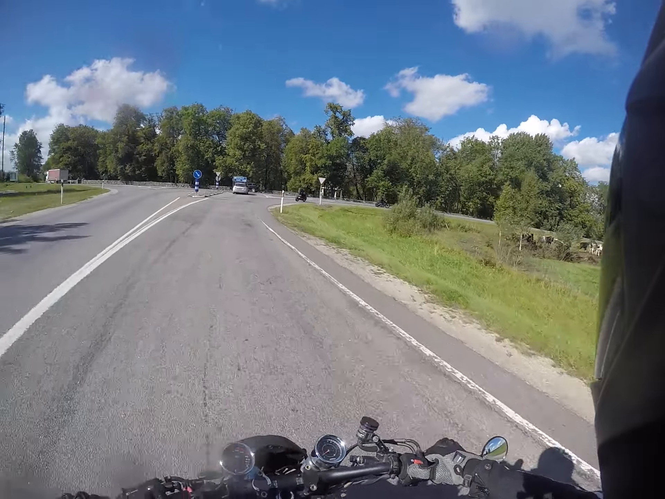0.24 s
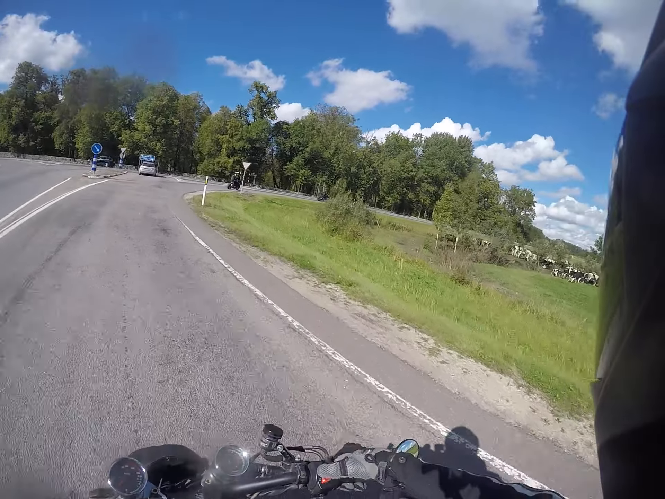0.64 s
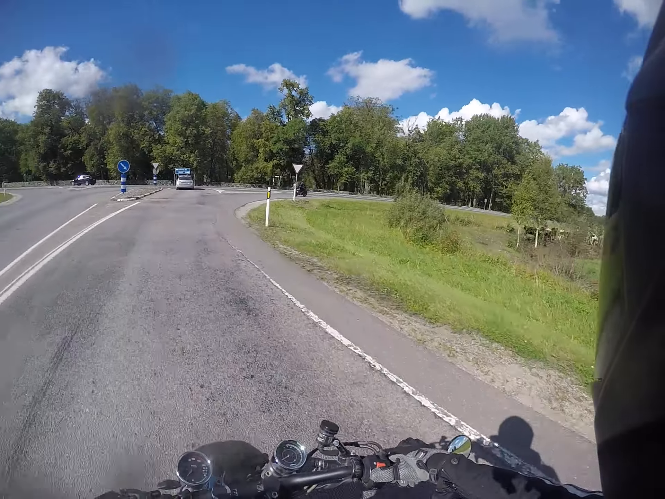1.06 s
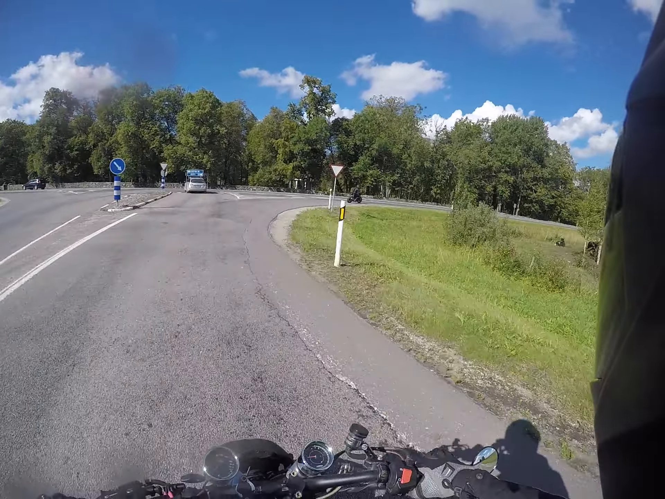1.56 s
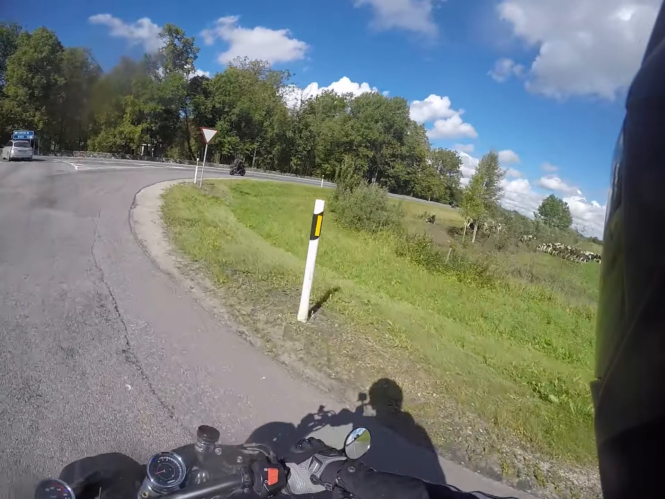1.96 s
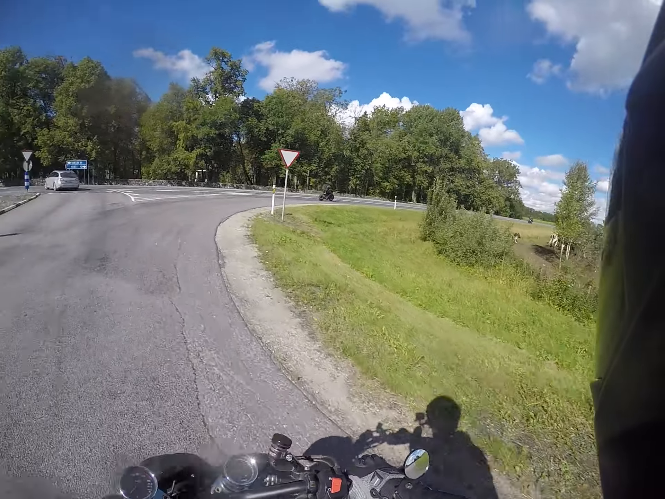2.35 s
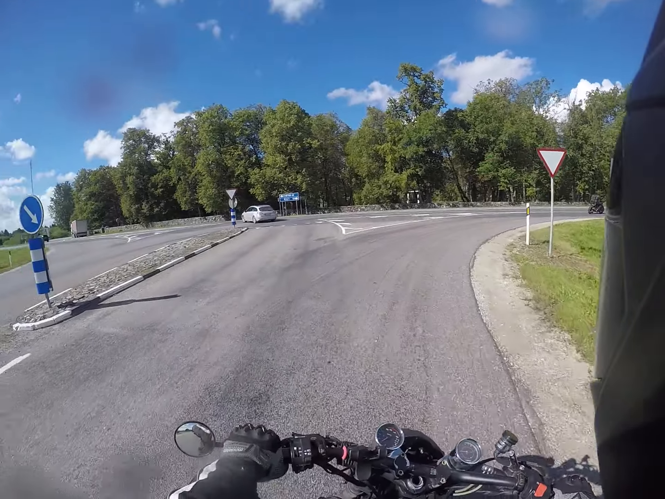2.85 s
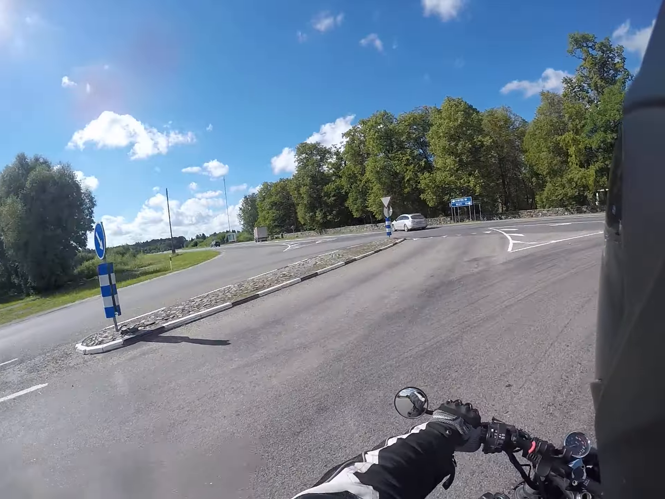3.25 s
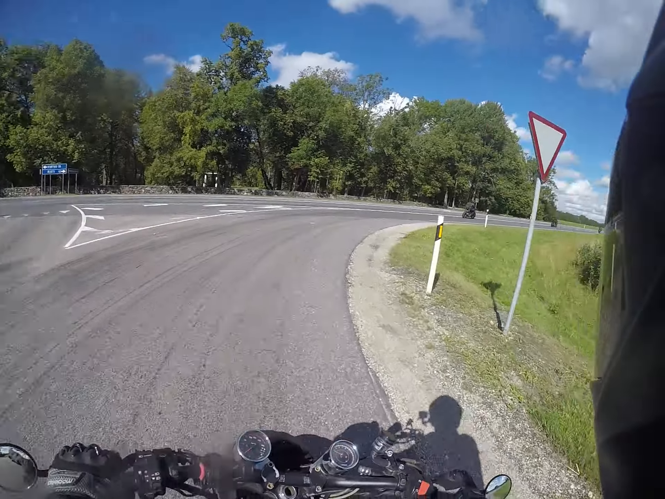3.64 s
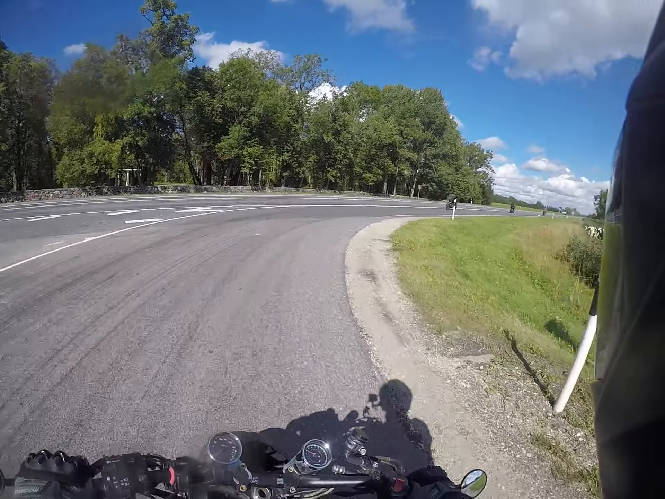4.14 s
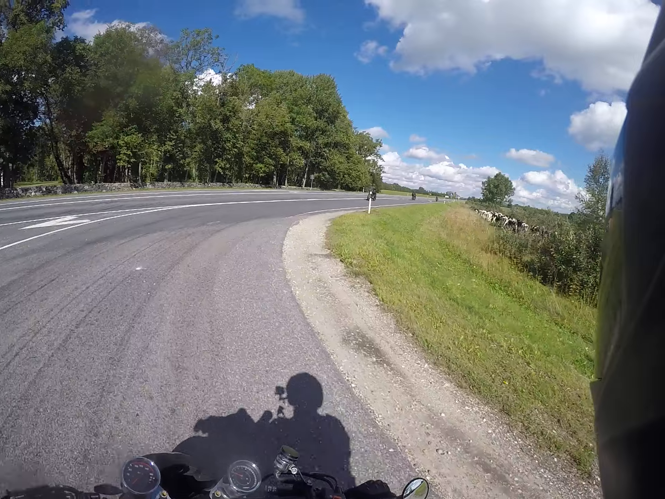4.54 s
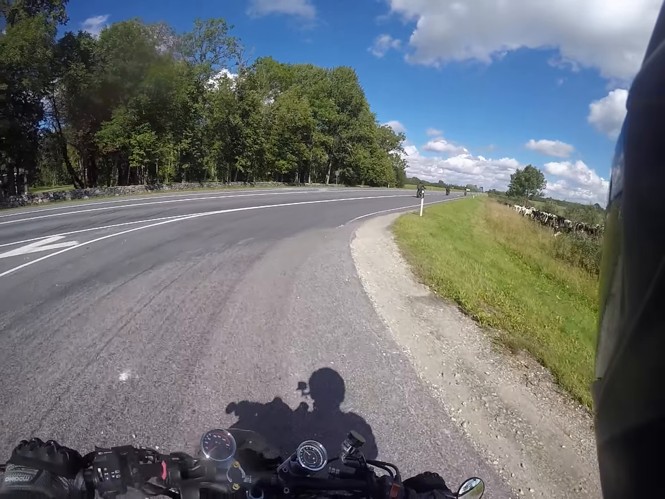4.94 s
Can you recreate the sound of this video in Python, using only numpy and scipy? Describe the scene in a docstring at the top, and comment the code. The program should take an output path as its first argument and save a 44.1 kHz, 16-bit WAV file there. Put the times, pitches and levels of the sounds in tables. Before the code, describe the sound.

A four-cylinder motorcycle slows, blips its throttle between two loud backfire bangs, sinks to a puttering idle, then pulls away through wind.

```python
"""At a road junction, from the rider's helmet: a four-cylinder motorcycle slows, idles and pulls away.
Summed overtones make the exhaust; pulses rung by the airbox make the bark. The revs sink, flare in one blip
between two loud bangs of burning fuel, settle to idle, where a weak bang sounds, then climb in three rises.
Shaped noise makes clatter, dull idle knocks, and the wind that buffets the microphone and whistles at the helmet,
over a rumble of tyres and frame. Farther off a second engine blips; a few brief swells of narrow noise pass."""
import sys
import numpy as np
from scipy import signal
from scipy.fft import rfft, irfft
from scipy.io import wavfile
from scipy.ndimage import uniform_filter1d

SR = 44100
rng = np.random.default_rng(int(sys.argv[2]) if len(sys.argv) > 2 else 0)


def to_wav(sig):
    """Store sig (one row per channel, or 1-D mono) as 16-bit WAV at the path in sys.argv[1].

    Samples outside -1..1 are clipped; the rate is SR.
    """
    pcm = np.clip(np.atleast_2d(sig), -1, 1) * 32767
    pcm = np.round(pcm).astype(np.int16)
    wavfile.write(sys.argv[1], SR, pcm.T)  # frames by channels


N = 229187
T = np.arange(N) / SR  # time [s]
HZ = np.fft.rfftfreq(N, 1 / SR)  # spectrum bins [Hz]

# Twists of the throttle: (opens [s], shuts [s], firing rate reached [1/s], bend of the climb [exponent],
# lift of the firing tone [dB], overtones under load [dB], bark under load [dB])
THROTTLE = [(.395, .636, 348.5, 1.24, 4, -24, -20.5), (3.391, 3.985, 102, .72, 2.5, -39.5, -59),
            (4.185, 4.447, 77, 1.04, 3.5, -40, -60), (4.447, 4.719, 171.4, 2.58, 0, -38.5, -59),
            (4.985, 5.183, 163.5, .8, -5.5, -38, -48)]
# Exhaust with the throttle shut: (firing rate [1/s], firing tone [dB], overtones [dB])
COASTING = [(40.97, -34, -38), (53, -31.5, -40), (79.12, -26, -42.5), (104, -28, -47.5),
            (129.5, -22.5, -44.5), (200, -22.5, -52), (273, -19, -30.5), (340, -20, -52)]
# Exhaust overtones, half orders from unequal cylinders: (multiple of the firing rate [ratio], level [dB])
ORDERS = [(.5,-8),(1.5,-3.5),(2,6),(2.5,-15),(3,-2),(4,-5.5),(5,-10.5),(6,-12)]
# What the pipe favours in the overtones: (frequency [Hz], width [Hz], level [dB])
PIPE = [(134,175,-1.5),(237.6,59,-1),(367,50,-1),(610,260,-14)]
# Airbox and pipe resonances behind the bark: (frequency [Hz], width [Hz], level [dB])
AIRBOX = [(356,88,1.5),(580,250,-4),(861,68,0.5),(995,81,-10),(1270,390,-35),(1710,210,-12),(3020,490,-19)]
# Spectrum of valves and chain, ahead of the housing: (frequency [Hz], density [dB per Hz, relative])
CLATTER = [(240, -14.5), (400, -7), (473, -34), (643, 0.5), (738, -17), (860, -25.5), (1360, -9.5),
           (1740, -4.5), (2060, -14), (3160, -12), (3460, -12.5), (4160, -17.5), (6380, -18), (7440, -28.5),
           (15500, -44.5)]
# What the idle knock rings: (frequency [Hz], width [Hz], level [dB])
CASING = [(602,23,9.5),(1020,73,-14),(2010,190,11.5),(3000,300,-30)]
# Exhaust bangs: (time [s], pressure wave scale [dB], ring peak [dB], spit scale [dB], length of the push [s])
BANGS = [(0.2935,-2.5,-3.5,-17.5,0.0035),(1.159,-1.5,-3.5,-11,0.0041),(3.247,-23,-29,-64,0.0031)]
# What the silencer rings with: (frequency [Hz], width [Hz], level [dB])
SILENCER = [(375,85,22),(448,110,-17),(694,32,17),(920,50,-24),(920,31,-11),(1440,60,-17),(1920,19,21),(2280,32,-19),(3000,38,-26),(2800,44,-7),(4040,83,-61),(4630,180,-9)]
# Spectrum of the gas spitting out: (frequency [Hz], density [dB per Hz, relative])
SPIT = [(300,-0.5),(1500,1),(4600,-8.5),(6000,-16),(15000,-35)]
# Hollow colour of the camera housing: (frequency [Hz], width [Hz], boost or cut [dB])
HOUSING = [(451,47,-3),(685,25,5),(744,93,10),(1025,130,13.5),(1350,260,-9),(2054,180,6.5),(2400,170,5),(2856,43,6.5),(3310,150,2.5),(3540,118,-10.5),(3796,140,6),(4034,160,4.5),(4810,98,10),(4960,230,-8),(5670,420,4),(6370,190,-30.5),(7710,210,12.5),(8070,360,-16),(8350,150,12.5),(10200,69,12)]
# Spells of wind round the helmet: (start [s], end [s], rush [dB], whistle [dB])
WIND = [(-.1, 0.663, -32.5, -31), (0.775, 1.37, -32.5, -35), (1.382, 1.553, -34, -31.5),
        (1.59, 1.83, -36.5, -32), (2.46, 2.697, -38.5, -36), (2.697, 3.06, -44, -36),
        (3.113, 3.81, -47.5, -39.5), (3.932, 4.155, -45.5, -38.5), (4.58, 4.933, -38.5, -42),
        (5.099, 5.304, -36, -41)]
# Spectrum of the rushing air, ahead of the housing: (frequency [Hz], density [dB per Hz, relative])
RUSH = [(200,-31),(500,-4),(1000,-12.5),(1350,5.5),(1900,-5.5),(2600,-0.5),(3600,-9),(4600,-14),(6500,-36),(15000,-51.5)]
# Strongest gusts on the microphone: (time [s], length [s], level [dB])
GUSTS = [(0.3, 0.054, -16), (.46, .04, -15), (1.5, .07, -25), (1.917, 0.068, -23), (2.074, 0.087, -16.5),
         (2.227, 0.063, -19.5), (2.438, 0.067, -21), (3.097, .09, -13.5), (3.312, 0.072, -18.5)]
# Spectrum of the gusts: (frequency [Hz], density [dB per Hz, relative])
GUST = [(5,-20),(16,-6.5),(26,22),(36,7.5),(50,-52),(100,-14),(200,-33),(400,-51),(2000,-84)]
# Rumble of tyres and frame: (time [s], level [dB])
ROAD_DB = [(0,-26),(.4,-30.5),(.6,-33.5),(.9,-30),(1.5,-32),(2.2,-38),(3.2,-38),(4,-34.5),(4.5,-33),(4.8,-26.5),(5,-28.5),(5.2,-37)]
# Spectrum of that rumble: (frequency [Hz], density [dB per Hz, relative])
ROAD = [(20,-20.5),(70,4.5),(130,-3.5),(240,-7),(400,-23),(650,-24.5),(800,-25),(1300,-27),(4000,-32.5),(15000,-56.5)]
# Second engine blipping farther off: (time [s], firing rate [1/s], level [dB])
FAR_BLIP = [(4.38,125,-65),(4.42,148,-41),(4.46,198,-31.5),(4.5,243,-38),(4.56,295,-45),(4.65,330,-44),(4.75,326,-45),(4.85,280,-70)]
# What carries of that engine: (frequency [Hz], width [Hz], level [dB])
FAR_BODY = [(377,140,-6.5),(696,70,-2),(1041.6,112.3,-2),(1570,110,6),(2040,92,7.5)]
# Brief swells of narrow noise, three near 800 Hz and two faint high hisses:
# (time [s], length [s], frequency [Hz], width of each filter pass [Hz], level [dB])
NOISE_SWELLS = [(3.325,0.022,820,350,-40),(3.644,0.011,780,350,-39),(3.693,0.013,800,350,-37),(4.573,0.07,11400,3000,-57),(4.955,0.15,10700,3500,-56.5)]

START_HZ, START_DRAG_PER_S = 212.7, 1.55  # first firing rate, and its exponential fall under the brakes
DRAG_PER_S, IDLE_HZ = 1.34, 42  # exponential fall with the throttle shut, down to the idle firing rate
OPEN_S, SHUT_S = 0.11, .03  # how fast the load builds and lets go
OVERRUN_DB, OVERRUN_S, OVERRUN_FADE_S = 2.5, 0.18, 0.063  # the pipe booms briefly after the throttle shuts
CANCEL_HZ, CANCEL_WIDTH_HZ, CANCEL_DB = 287, 20.2, -20  # the firing tone drops out as it passes this pitch
HIGH_HZ = 320  # firing rate at which the HIGH levels hold, apart from the floor
# With the throttle shut: level at HIGH_HZ, its slope with the revs, its floor
BARK_HIGH_DB, BARK_DB_PER_DECADE, BARK_IDLE_DB = -23, 70, -52.5
CLATTER_HIGH_DB, CLATTER_DB_PER_DECADE, CLATTER_IDLE_DB = -32, 54, -64
CLATTER_LOAD_DB, CLATTER_TOP_DB = 2.5, -34  # lift of the clatter under load, and its ceiling
WIND_RISE_S, WIND_FALL_S, CALM_RUSH_DB, CALM_WHISTLE_DB = 0.24, 0.19, -47.5, -47
BUFFET_DB, BUFFET_SWING_DB, BUFFET_HZ = -32.5, 2.5, 7.9  # the small gusts between the strong ones
EDGE_HZ = 15350  # top of the recorder's band


def speed():
    """Firings per second: an open throttle drives the revs to its mark, a shut one lets them sink to idle."""
    hz = START_HZ * np.exp(-START_DRAG_PER_S * T)
    for opens, shuts, top, bend, *_ in THROTTLE:
        low = np.interp(opens, T, hz)
        progress = np.clip((T - opens) / (shuts - opens), 0, 1)
        climb = low + (top - low) * progress ** bend
        coast = np.maximum(top * np.exp(-DRAG_PER_S * (T - shuts)), IDLE_HZ)
        hz = np.select([T < opens, T < shuts], [hz, climb], coast)
    return uniform_filter1d(hz, size=880, mode="nearest")  # smoothed over 20 ms


def with_revs(hz, high_db, db_per_decade, idle_db):
    """A level in dB that grows as a power of the revs, above a floor at idle."""
    growing = gain_of(high_db + db_per_decade * np.log10(hz / HIGH_HZ))
    return 20 * np.log10(np.hypot(growing, gain_of(idle_db)))


def engine_levels(hz):
    """Firing tone, overtones, bark and clatter in dB: set by the revs, changed by the load."""
    rate, tone, over = np.transpose(COASTING)
    cancelled = np.exp(-((hz - CANCEL_HZ) / CANCEL_WIDTH_HZ) ** 2)
    tone_db = np.interp(hz, rate, tone) + CANCEL_DB * cancelled
    over_db = np.interp(hz, rate, over)
    bark_db = with_revs(hz, BARK_HIGH_DB, BARK_DB_PER_DECADE, BARK_IDLE_DB)
    clatter_db = with_revs(hz, CLATTER_HIGH_DB, CLATTER_DB_PER_DECADE, CLATTER_IDLE_DB)
    for opens, shuts, _, _, lift_db, loaded_over_db, loaded_bark_db in THROTTLE:
        load = spell(opens, shuts, OPEN_S, SHUT_S)
        overrun = spell(shuts, shuts + OVERRUN_S, OVERRUN_FADE_S, OVERRUN_FADE_S)
        tone_db = tone_db + load * lift_db + OVERRUN_DB * overrun
        over_db = over_db + load * (loaded_over_db - over_db)
        bark_db = bark_db + load * (loaded_bark_db - bark_db)
        clatter_db = clatter_db + load * CLATTER_LOAD_DB
    return tone_db, over_db, bark_db, np.minimum(clatter_db, CLATTER_TOP_DB)


def exhaust(firings, hz, tone_db, over_db, waver=0.11, rough=0.22, throb=0.28, dull_db=1.0, smear=0.611):
    """A firing tone, and overtones through the pipe that dull and lope every four firings towards idle."""
    idle = np.clip(45 / hz, 0, 1) ** 3
    angle = 2 * np.pi * firings + .15 * idle * wander(20)
    tone = np.cos(angle) * (1 + waver * wander(69))
    overtones = np.zeros(N)
    for k, db in ORDERS:
        strength = gain_of(db - dull_db * idle * (k - 2)) * (1 + rough * wander(25))
        overtones += strength * np.cos(k * angle - smear * k ** 2)
    lope = 1 + throb * idle * np.cos(np.pi * firings / 2)
    piped = lope * housed(ring(overtones, PIPE))
    return np.sqrt(2) * (gain_of(tone_db) * tone + gain_of(over_db) * piped)


def bark(firings, hz, level_db, body, top_hz=2600):
    """One pulse a firing rings the body; the four cylinders differ more at high revs."""
    angle = 2 * np.pi * (firings + .012 * wander(150))
    pulses = np.zeros(N)
    for k in np.arange(2, 32):
        # the intake runners smear each pulse: higher harmonics arrive later
        pulses += np.cos(k * angle - .2 * k ** 2) / (1 + (k * hz / top_hz) ** 2)
    unequal = .2 * hz / 350
    cylinders = np.cos(np.pi * firings) + np.cos(np.pi * firings / 2) + wander(150)
    sound = ring(pulses * (1 + unequal * cylinders), body)
    power = uniform_filter1d(sound ** 2, size=2500)  # over 57 ms, so that level_db sets the loudness
    return gain_of(level_db) * sound / np.sqrt(abs(power) + 1e-12)


def clatter(firings, hz, level_db, uneven_db=1.0, rasp_db=2):
    """Valves and chain rattle in a burst at each firing; at high revs a rasp locked to the crank joins in."""
    strokes = .4 + np.exp(-(firings % 1) / .22)
    rattle = evened(noise() * strokes * gain_of(uneven_db * wander(87)))
    crank = np.pi * firings + .025 * wander(60)  # one turn in two firings
    rasp = np.zeros(N)
    for k in np.arange(9, 36):
        rasp += np.cos(k * crank + rng.uniform(0, 2 * np.pi)) * (1 + wander(25))
    joined = .4 * (hz / 350) ** 2
    mixed = rattle + gain_of(rasp_db) * joined * evened(rasp)
    sound = housed(shaped(mixed, CLATTER))
    treble = irfft(rfft(sound) * (HZ > 5000), N)
    return gain_of(level_db) * sound / treble.std()  # level_db is that of the treble alone


def putter(firings, hz, level_db=-49, ring_s=.002, uneven_db=3, top_hz=3000, fades_above_hz=75):
    """Near idle each turn of the crank, once in two firings, is heard as a separate dull knock."""
    u = (firings / 2 % 1) * 2 / hz / ring_s  # time since the knock, in units of ring_s
    knocks = noise() * u * np.exp(-u) * gain_of(uneven_db * wander(20))
    dull = irfft(rfft(ring(knocks, CASING)) / (1 + (HZ / top_hz) ** 6), N)
    idle = np.clip(fades_above_hz / hz, 0, 1) ** 2
    return gain_of(level_db) * idle * evened(dull)


def bangs(damping=0.6, decay_s=0.0093, delay_s=0.0031):
    """Unburnt fuel goes off in the pipe: push, deep suck, rebound; the silencer rings and gas spits out."""
    out = np.zeros(N)
    for s, wave_db, ring_db, spit_db, push_s in BANGS:
        t = np.maximum(T - s, 0)
        u = t / push_s
        wave = u * np.exp(-damping * u) * np.cos(np.pi * u / 2)
        click = 1. * (np.arange(N) == int((s + delay_s) * SR))
        clang = ring(muffled(click, 2450), SILENCER)
        spit = np.minimum(t / delay_s, 1) * np.exp(-t / decay_s) * shaped(noise(), SPIT)
        out += gain_of(wave_db) * wave
        out += gain_of(ring_db) * clang / abs(clang).max()
        out += gain_of(spit_db) * spit
    return out


def wind():
    """Strength of the rush and of the whistle: spells of wind add their power to calmer air."""
    power = gain_of([[CALM_RUSH_DB], [CALM_WHISTLE_DB]]) ** 2
    for start, end, rush_db, whistle_db in WIND:
        swell = spell(start - WIND_RISE_S / 2, end - WIND_FALL_S / 2, WIND_RISE_S, WIND_FALL_S)
        power = power + (gain_of([[rush_db], [whistle_db]]) * swell) ** 2
    return np.sqrt(power)


def rush(strength, flutter_db=1.22):
    """Turbulent air hisses round the helmet."""
    air = evened(housed(shaped(noise(), RUSH)))
    return strength * gain_of(flutter_db * wander(51)) * air


def whistle(strength, hz=1735, width_hz=120, flutter_db=1.23):
    """Air blows across a cavity of the helmet: a fuzzy tone of fixed pitch."""
    cavity = [(hz, width_hz, 0)]
    tone = evened(ring(ring(noise(), cavity), cavity))
    return strength * gain_of(flutter_db * wander(18)) * tone


def rumble(bumps_db=2):
    """Gusts thump the microphone over the rumble of tyres and frame."""
    small = gain_of(BUFFET_DB + BUFFET_SWING_DB * wander(BUFFET_HZ))
    strong = sum(gain_of(db) * bump(s, length) for s, length, db in GUSTS)
    gusts = np.hypot(small, strong) * shaped(noise(), GUST)
    road_db = curves(ROAD_DB)[0] + bumps_db * wander(5.6)
    return gusts + gain_of(road_db) * shaped(noise(), ROAD)


def far_engine():
    """Only the bark of the other engine carries this far."""
    hz, level_db = curves(FAR_BLIP)
    return bark(np.cumsum(hz) / SR, hz, level_db, FAR_BODY)


def noise_swells():
    """Brief soft swells of narrow noise: white noise through the same resonance twice."""
    out = np.zeros(N)
    for s, length, hz, width, db in NOISE_SWELLS:
        band = [(hz, width, 0)]
        out += gain_of(db) * bump(s, length) * evened(ring(ring(noise(), band), band))
    return out


def gain_of(db):
    """Decibels to amplitude."""
    return 10 ** (np.asarray(db) / 20)


def evened(x):
    """Scales to rms 1."""
    return x / np.sqrt(np.mean(x ** 2) + 1e-20)


def noise():
    """White noise."""
    return rng.standard_normal(N)


def wander(hz):
    """Slow chance up to a rate, at rms 1."""
    return evened(irfft(rfft(noise()) / (1 + (HZ / hz) ** 4), N))


def curves(rows):
    """Each column of a table after the first as a curve over time."""
    s, *columns = np.transpose(rows)
    return [np.interp(T, s, c) for c in columns]


def bump(s, length):
    """A bell-shaped swell that peaks at 1 at time s."""
    return np.exp(-(2 * (T - s) / length) ** 2)


def spell(start, end, rise, fall):
    """Swells smoothly from 0 to 1 after start, and back to 0 after end."""
    ramp = np.minimum((T - start) / rise, 1 - (T - end) / fall)
    return np.sin(np.pi / 2 * np.clip(ramp, 0, 1)) ** 2


def shaped(x, points):
    """Weights the spectrum of x by a curve over log frequency, at rms 1."""
    f, db = np.transpose(points)
    curve_db = np.interp(np.log(HZ + 1), np.log(f), db)
    return evened(irfft(rfft(x) * gain_of(curve_db), N))


def ring(x, modes):
    """Passes x through a set of resonances side by side."""
    response = sum(gain_of(g) / (1 + 1j * (HZ ** 2 - f ** 2) / (w * HZ + 1e-9)) for f, w, g in modes)
    return irfft(rfft(x) * response, N)


def housed(x):
    """The peaks and dips of the camera housing."""
    db = sum(g / (1 + (2 * (HZ - f) / w) ** 2) for f, w, g in HOUSING)
    return irfft(rfft(x) * gain_of(db), N)


def muffled(x, hz):
    """Rolls off the treble above hz."""
    return irfft(rfft(x) / (1 + 1j * HZ / hz) ** 2, N)


def scene():
    """Engine speed and load drive exhaust, bark and clatter; wind and road lie round them."""
    hz = speed()
    firings = np.cumsum(hz) / SR
    tone_db, over_db, bark_db, clatter_db = engine_levels(hz)
    rush_strength, whistle_strength = wind()
    engine = exhaust(firings, hz, tone_db, over_db) + bark(firings, hz, bark_db, AIRBOX)
    engine += clatter(firings, hz, clatter_db) + putter(firings, hz) + bangs()
    air = rush(rush_strength) + whistle(whistle_strength)
    return (engine + air + rumble() + far_engine() + noise_swells())[None]


def record(dry):
    """The recorder clips the tallest peaks and limits the band."""
    held = np.clip(dry, -.92, .92)
    lowpass = signal.firwin(511, EDGE_HZ, window=("kaiser", 9), fs=SR)
    return signal.oaconvolve(held, lowpass[None], "same")


dry = scene()
out = record(dry)
to_wav(out)
```